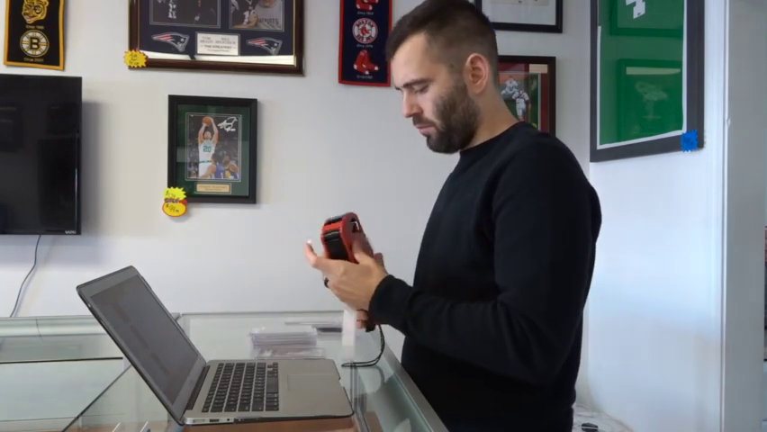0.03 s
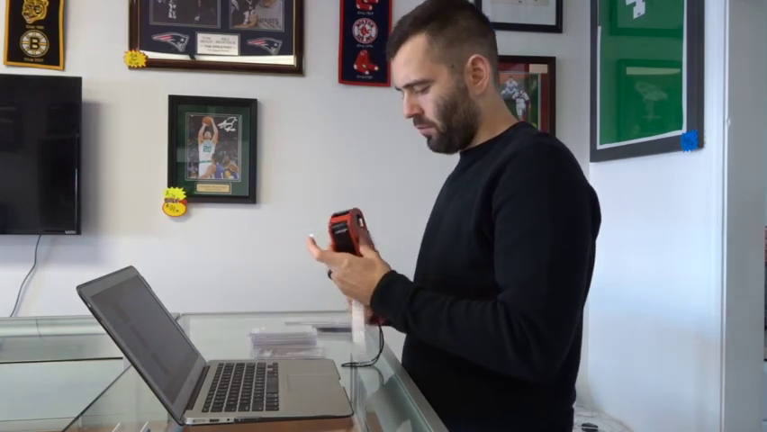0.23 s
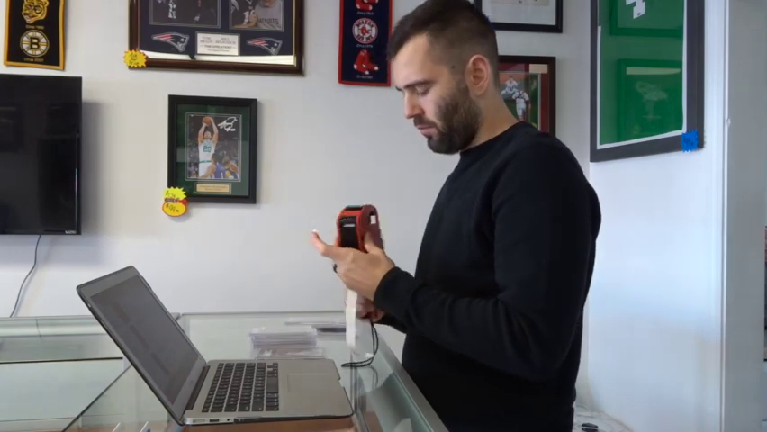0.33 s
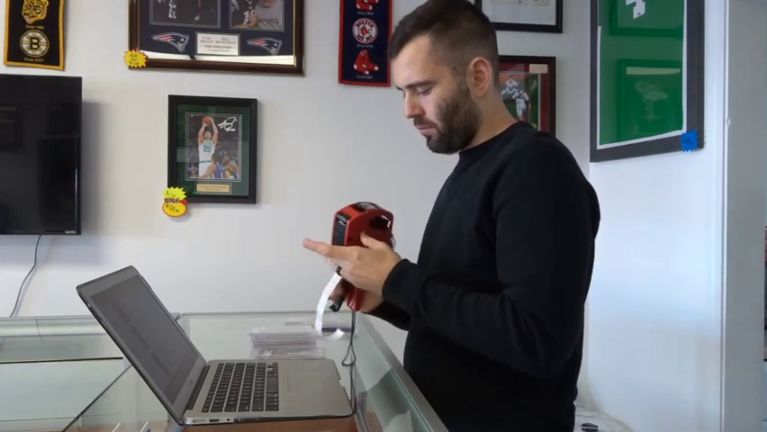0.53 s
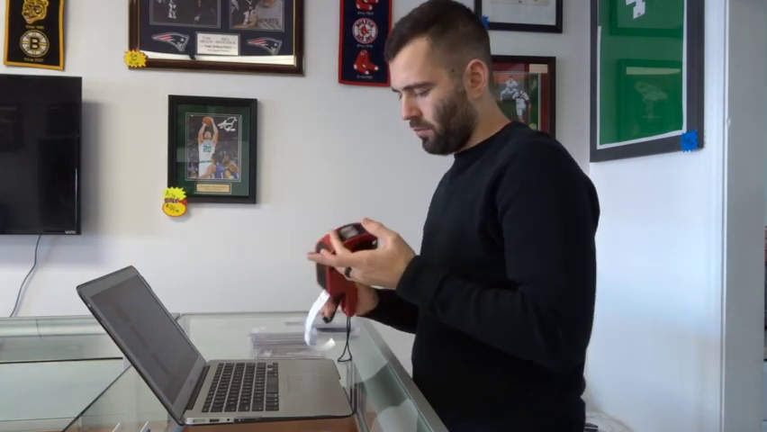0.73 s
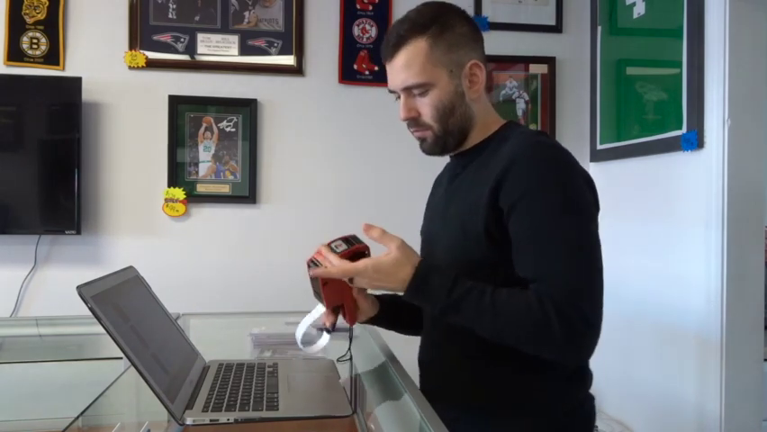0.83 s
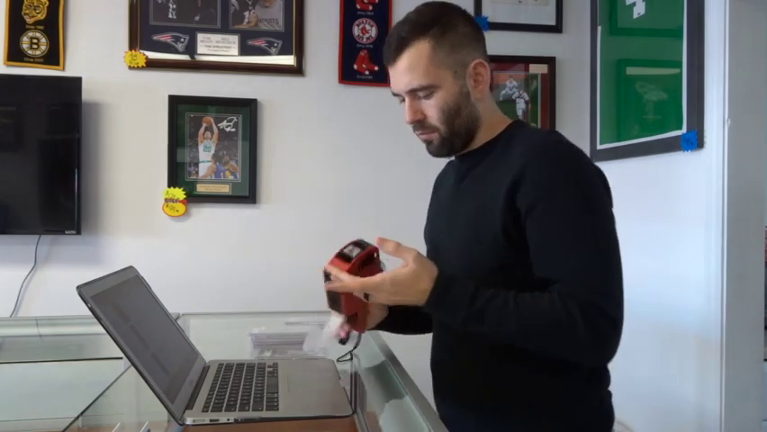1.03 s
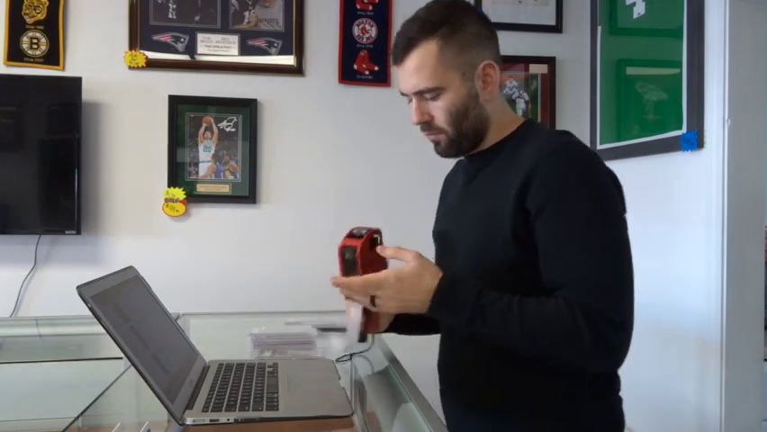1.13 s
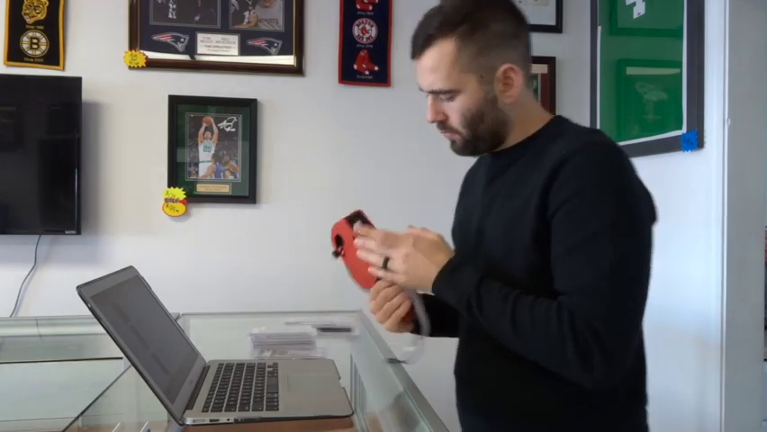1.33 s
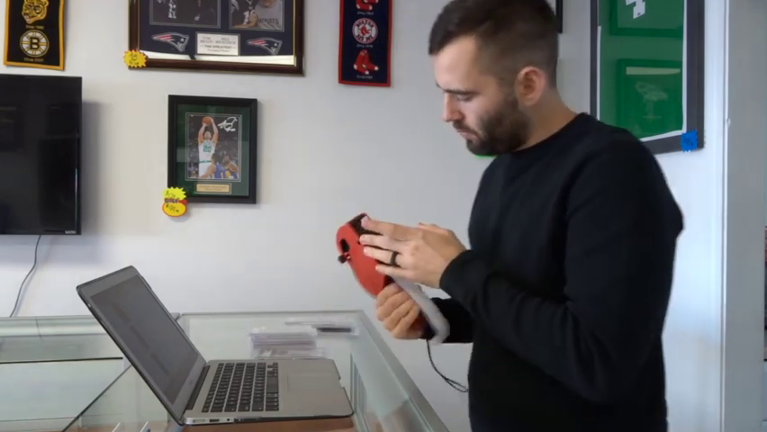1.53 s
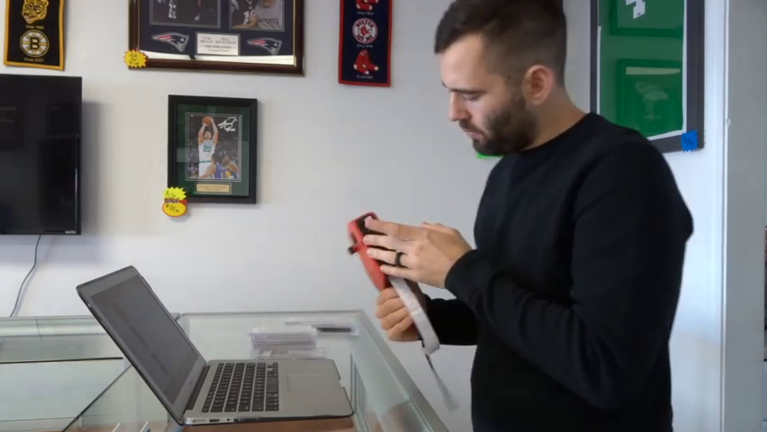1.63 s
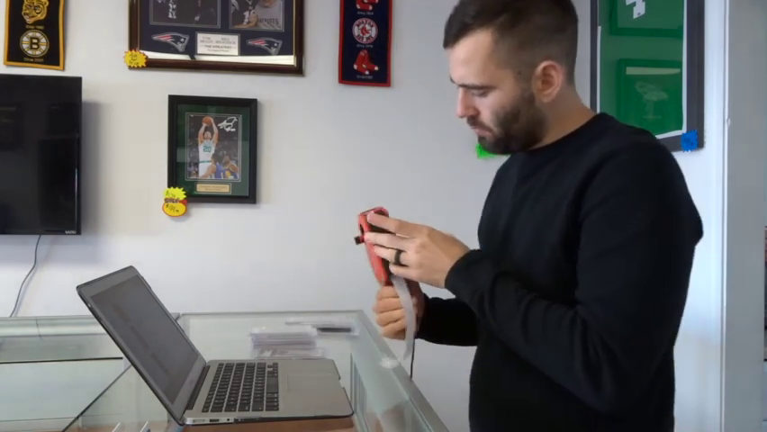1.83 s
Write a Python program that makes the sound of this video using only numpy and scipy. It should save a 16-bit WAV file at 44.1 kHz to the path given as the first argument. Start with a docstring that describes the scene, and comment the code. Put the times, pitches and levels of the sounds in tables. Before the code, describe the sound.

Two quick, rattling clacks come from a hand-worked price-label gun, then a sharp snap, a soft knock with a faint rub, and a few small ticks. The nearby sounds echo briefly off hard walls over a low ventilation hum.

```python
"""A plastic price-label gun is worked by hand in a small, hard-walled shop.
The trigger is squeezed and springs back, each time with a run of ringing clacks. A catch snaps,
then the gun is turned over with light ticks, a faint rub and a dull knock. Each hit is a short
burst of noise plus a few fading tones. The room rings briefly over a low ventilation hum."""
import sys
import numpy as np
from scipy import signal
from scipy.fft import rfft, irfft, next_fast_len
from scipy.io import wavfile
from scipy.ndimage import uniform_filter1d

SR = 44100
rng = np.random.default_rng(int(sys.argv[2]) if len(sys.argv) > 2 else 0)


def put_to_file(sound):
    """Save the sound as 16-bit audio at rate SR, in the file named by the first command-line argument."""
    columns = np.atleast_2d(sound).T  # one column per channel
    safe = np.clip(columns, -1, 1)
    whole_steps = np.round(safe * 32767)
    wavfile.write(sys.argv[1], SR, whole_steps.astype(np.int16))


N = 83790

# Levels in the tables are relative. A fade_s is the time a tone or echo takes to drop by 60 dB.
# tone of the ventilation hum: pitch_hz, level_db
HUM_COLOUR = [(13, -28.5), (22, -4.5), (49, -9), (144, -6.5), (172, -5.5), (200, -1), (238, -2),
              (268, -12.5), (370, -16.5), (450, -31.5), (620, -91)]
# how the hum dips and swells: time_s, level_db
HUM_SWELL = [(0.0, -48), (0.196, -51), (1.9, -46)]
# tone of the faint hiss of the air: pitch_hz, level_db
AIR_COLOUR = [(400, -1.5), (950, -4), (1300, -10), (2400, -12.5), (3500, -21.5), (11000, -31.5)]
# how much left and right differ, against what they share: pitch_hz, difference_db
STEREO_WIDTH = [(150, -31.5), (300, -12.5), (1000, -5.5), (2400, -5), (4300, 2), (10000, 5)]

# light ticks as the gun is handled: start_s, crack_db, ring_db, chatter_decay_s
TICK_HITS = [(.002, -2, -10.5, 0.012), (.158, -12.5, -28, 0.006), (.208, 1, -12.5, 0.015),
             (.9245, -1.5, -30, 0.0064), (1.2725, -4, -5, 0.016), (1.327, -7.5, -19, 0.011),
             (1.391, -6.5, -15.5, 0.02)]
# tone of a tick's crack: pitch_hz, level_db
TICK_CRACK = [(100, -57), (600, -2), (980, 13.5), (1250, -4.5), (1700, 7), (2500, 5), (3600, -6),
              (5000, -10.5), (7000, -15), (11000, -30.5)]
# small parts that ring with a tick: pitch_hz, level_db, fade_s
SMALL_PART_TONES = [(2355, -0.5, 0.096), (2760, -4, 0.1), (4340, -4, 0.031), (4550, 2, 0.038)]
# the room's lingering echo: pitch_hz, level_db, fade_s
ROOM_TAIL = [(150, 16, 0.52), (504, -2.5, 0.6), (990, -2, 0.72), (2460, -1.5, 0.4), (4500, -2, 0.5),
             (9000, 1, 0.32)]

# trigger clacks, squeeze then return: start_s, crack_db, ring_db, chatter_decay_s
CLACK_HITS = [(0.227, -4.5, -24.5, 0.013), (.239, -4.5, -14, 0.006), (.250, 0.5, 5, 0.01),
              (.258, -1, -3, 0.012), (.266, -10, 4, 0.009), (0.2746, -8, 3, 0.0059), (0.2826, -3, 1, 0.021),
              (.301, -6, 3.5, 0.075), (.313, -13, -1, 0.0081), (0.4073, -6, -18, 0.0052),
              (0.4164, 2, -0.5, 0.0036), (.4215, -4.5, 1.5, 0.0038), (0.4267, 4, 0.5, 0.0039),
              (.435, 4, -3, 0.0053), (0.444, -2.5, -3, 0.0086), (0.4604, -0.5, -7, 0.011),
              (.474, -5, -3.5, 0.041), (.615, -18, -44, 0.014)]
# tone of a clack's crack: pitch_hz, level_db
CLACK_CRACK = [(100, -41), (300, -10.5), (680, -8.5), (950, 14), (1150, -11), (1380, -5), (1620, 6),
               (1950, 1.5), (2350, 3.5), (4200, 0), (5200, -4), (7000, -3), (11000, -12.5)]
# ringing pitches heard with the trigger clacks: pitch_hz, squeeze_db, return_db, fade_s
CLACK_RING_TONES = [(767, -12.5, -46, 0.09), (809.3, -3.5, -0.5, 0.064), (870, -18, -7, 0.098),
                    (876, -11.5, -2.5, 0.042), (973, -1.5, -2, 0.074), (1033.6, -4.5, -7.5, 0.14),
                    (1568, -8.5, -8, 0.035), (1663, -2, -7.5, 0.042), (1774, -17, -14, 0.17)]

# the catch is moved, then snaps free: start_s, crack_db, ring_db, chatter_decay_s
SNAP_HITS = [(.229, -23, -4, 0.0034), (.2415, -26, 6, 0.0046), (.2505, -25, 8, .003),
             (.3735, -1.5, -6.5, 0.0044), (.6868, 5.5, -10, 0.0055), (.690, -3, -27, .0015),
             (.695, -1, -2, 0.009), (.7065, -1, -16, 0.0033), (.716, 4, 5, 0.005)]
# tone of a snap's crack: pitch_hz, level_db
SNAP_CRACK = [(150, -38), (680, -23.5), (1040, -2.5), (1350, -19), (1700, 1.5), (1950, -12), (2400, -1),
              (3400, 5.5), (4500, -5), (6500, -12), (11000, -24.5)]
# ringing of the catch: pitch_hz, level_db, fade_s
CATCH_TONES = [(835, -22.5, 0.59), (1084, -9.5, 0.076), (2368, -2.5, 0.046), (3014, -11.5, 0.033),
               (3420, -20.5, 0.046), (6430, -24.5, .04)]

# loudness of the sliding fingers: time_s, level_db
RUB_LEVEL = [(1.06, -61), (1.10, -55), (1.152, -58), (1.251, -62), (1.6, -100)]
# tone of the rub: pitch_hz, level_db
RUB_HISS = [(300, 5), (1500, 7), (3500, -2.5), (7500, -10), (11000, -21)]
# knocks of the hand on the case: start_s, thud_db, ring_db, chatter_decay_s
KNOCK_HITS = [(1.068, 1, -2, 0.0017), (1.078, 5, -0.5, 0.02)]
# tone of a knock's thud: pitch_hz, level_db
KNOCK_THUD = [(80, -2.5), (280, 4.5), (850, -0.5), (1500, -11), (2400, -3.5), (3300, -13.5), (4500, -24),
              (11000, -56)]
# ringing of the gripped case: pitch_hz, level_db, fade_s
CASE_TONES = [(357, -3.5, 0.11), (572.5, 1, 0.06), (755, -2, 0.036)]


def from_db(db):
    """Turn decibels into a number to multiply a sound by."""
    return 10 ** (np.asarray(db) / 20)


def rms_one(x):
    """Scale a sound so that its average strength (rms) is 1."""
    return x / np.sqrt(np.mean(x ** 2) + 1e-20)


def at_hz(points, hz):
    """Read between the rows of a table, giving each octave equal room."""
    pitches, values = np.transpose(points)
    return np.interp(np.log(np.maximum(hz, 1)), np.log(pitches), values)


def coloured(x, colour):
    """Make each pitch louder or softer as the colour table says."""
    size = 2 * next_fast_len(N)
    gains = from_db(at_hz(colour, np.fft.rfftfreq(size, 1 / SR)))
    # a minimum-phase filter: nothing sounds before the hit that causes it
    cepstrum = irfft(np.log(gains))
    cepstrum[1:size // 2] *= 2
    cepstrum[size // 2 + 1:] = 0
    return irfft(rfft(x, size) * np.exp(rfft(cepstrum)))[..., :N]


def wide_noise():
    """Stereo noise: left and right are alike in the bass and differ in the treble."""
    shared, difference = rng.standard_normal((2, N))
    return shared + from_db(-2) * coloured(difference, STEREO_WIDTH) * np.array([[1], [-1]])


def plastic_hits(hits, colour, tones, crack_db, ring_db):
    """Each hit makes the plastic chatter briefly and starts a set of ringing tones."""
    t = np.arange(N) / SR
    rise_share = 0.274  # the chatter's rise time as a share of its decay time
    cracks, blows, ring = np.zeros((3, N))
    for start_s, hit_db, blow_db, decay_s in hits:
        start = int(start_s * SR)
        age = np.minimum(t / decay_s, 50)
        shape = np.exp(-age) * (1 - np.exp(-age / rise_share))
        chatter = rms_one(rng.standard_normal(N) * shape) / np.sqrt(N)
        cracks[start:] += from_db(hit_db) * chatter[:N - start]
        blows[start] += from_db(blow_db)
    for hz, level_db, fade_s in tones:
        ring += from_db(level_db - 60 * np.minimum(t / fade_s, 10)) * np.sin(2 * np.pi * hz * t)
    # the ring keeps little sound below its lowest tone
    lowest_hz = tones[0][0]
    ring = signal.sosfilt(signal.butter(4, .9 * lowest_hz, "high", fs=SR, output="sos"), ring)
    ringing = signal.fftconvolve(blows, ring)[:N]
    return from_db(crack_db) * coloured(cracks, colour) + from_db(ring_db) * ringing


def ventilation():
    """A low hum that dips, then swells a little, with a faint steady hiss of air."""
    level_db = np.interp(np.arange(N) / SR, *np.transpose(HUM_SWELL)) - 2
    hum = from_db(level_db) * rms_one(coloured(wide_noise(), HUM_COLOUR))
    hiss = from_db(-56) * rms_one(coloured(wide_noise(), AIR_COLOUR))
    return hum + hiss


def handling_ticks():
    """Loose small parts tick and ring as the gun is handled."""
    return plastic_hits(TICK_HITS, TICK_CRACK, SMALL_PART_TONES, crack_db=-9, ring_db=-36.5)


def evened(response, band_hz):
    """Even out a room's tone so that it favours no range of pitches wider than band_hz."""
    hz = np.fft.rfftfreq(N, 1 / SR)
    power = np.abs(rfft(response.mean(0))) ** 2
    smooth = uniform_filter1d(power, size=int(band_hz / hz[1]))
    excess_db = 10 * np.log10(smooth / smooth.mean())
    return coloured(response, np.c_[hz, -excess_db][1:])


def shop_echo(sound):
    """Add early echoes off the glass counter and wall, then a tail that dies sooner in the treble."""
    first_echo_s, early_decay_s, tail_build_s = 0.0055, 0.023, 0.015
    early_db, tail_db = -0.5, -6
    t = np.maximum(np.arange(N) / SR - first_echo_s, 0)
    early = wide_noise() * (t > 0) * np.exp(-t / early_decay_s)
    noise_spectrum, hz = rfft(wide_noise()), np.fft.rfftfreq(N, 1 / SR)
    pitches, levels_db, fades_s = np.transpose(ROOM_TAIL)
    tail = np.zeros((2, N))
    for band, level_db, fade_s in zip(np.eye(len(pitches)), levels_db, fades_s):
        band_noise = irfft(noise_spectrum * at_hz(np.c_[pitches, band], hz), N)
        tail += band_noise * from_db(level_db - 60 * t / fade_s)
    tail *= 1 - np.exp(-t / tail_build_s)
    echoes = (from_db(early_db) * rms_one(early) + from_db(tail_db) * rms_one(tail)) / np.sqrt(N)
    direct = signal.unit_impulse(N)
    room = evened(direct + echoes, band_hz=42)
    return signal.fftconvolve(sound[None], room, axes=1)[:, :N]


def trigger():
    """The trigger clacks when squeezed and as it springs back; the return favours the lower tones."""
    return_s, crack_db, ring_db = 0.4, 8, -25.5
    squeeze_hits = [hit for hit in CLACK_HITS if hit[0] < return_s]
    return_hits = [hit for hit in CLACK_HITS if hit[0] >= return_s]
    squeeze_tones = [(hz, db, fade_s) for hz, db, _, fade_s in CLACK_RING_TONES]
    return_tones = [(hz, db, fade_s) for hz, _, db, fade_s in CLACK_RING_TONES]
    return (plastic_hits(squeeze_hits, CLACK_CRACK, squeeze_tones, crack_db, ring_db)
            + plastic_hits(return_hits, CLACK_CRACK, return_tones, crack_db, ring_db))


def catch():
    """The catch rings as the trigger moves it, then snaps free."""
    return plastic_hits(SNAP_HITS, SNAP_CRACK, CATCH_TONES, crack_db=4, ring_db=-20.5)


def finger_rub():
    """Skin slides over plastic with a faint dry hiss as the gun is turned."""
    level_db = np.interp(np.arange(N) / SR, *np.transpose(RUB_LEVEL), left=-120)
    return from_db(level_db) * rms_one(coloured(rng.standard_normal(N), RUB_HISS))


def hand_knock():
    """The hand bumps the gripped case, which thuds and rings low."""
    return plastic_hits(KNOCK_HITS, KNOCK_THUD, CASE_TONES, crack_db=-8, ring_db=-37.5)


def scene():
    """The gun, slightly to the right, in the humming shop."""
    pan_db = 0.55
    gun = trigger() + catch() + handling_ticks() + hand_knock() + finger_rub()
    return shop_echo(gun) * from_db([[-pan_db], [pan_db]]) + ventilation()


def record(dry):
    """Round off the loudest peaks and cut away the highest treble."""
    ceiling, cutoff_hz = 0.62, 11080
    rounded = dry / (1 + (dry / ceiling) ** 4) ** (1 / 4)
    return signal.sosfilt(signal.ellip(12, .2, 80, cutoff_hz, fs=SR, output="sos"), rounded)


dry = scene()
out = record(dry)
put_to_file(out)
```